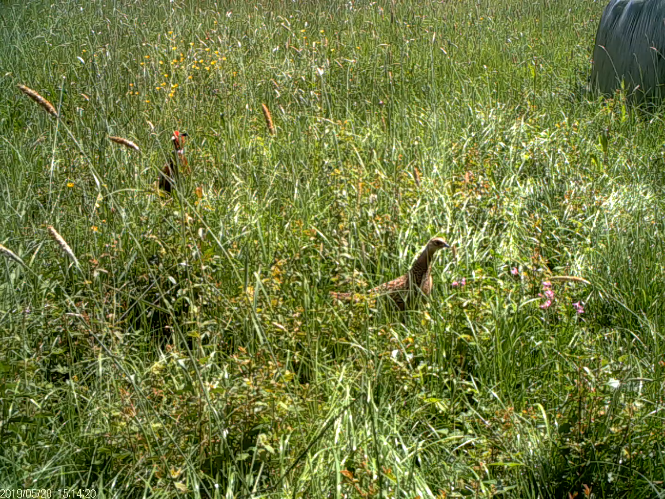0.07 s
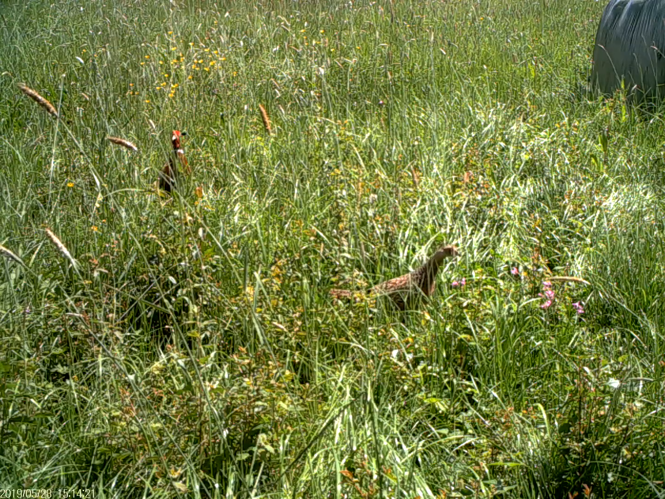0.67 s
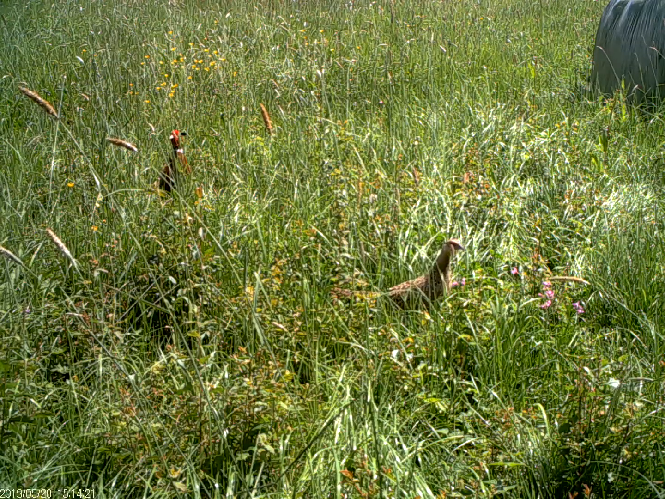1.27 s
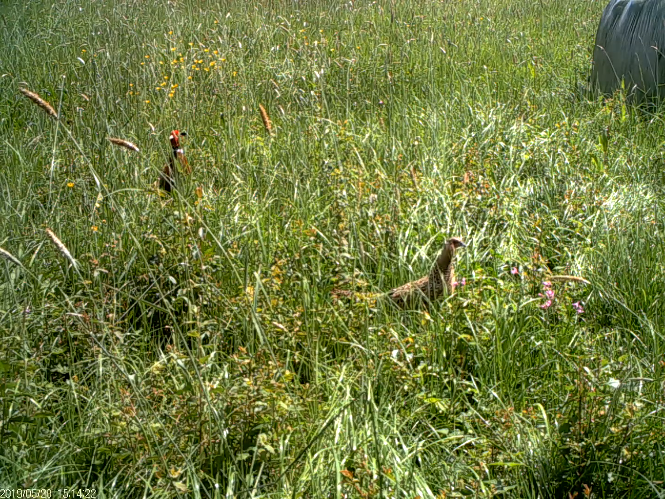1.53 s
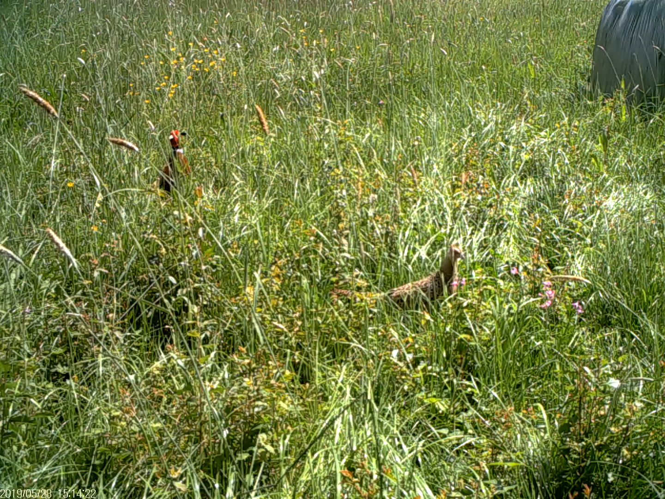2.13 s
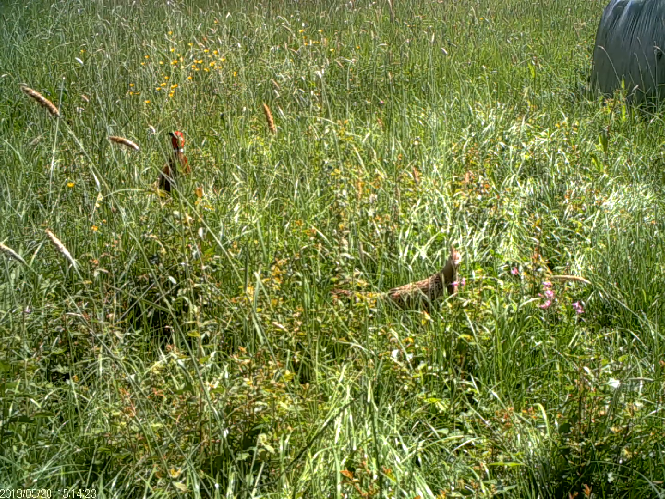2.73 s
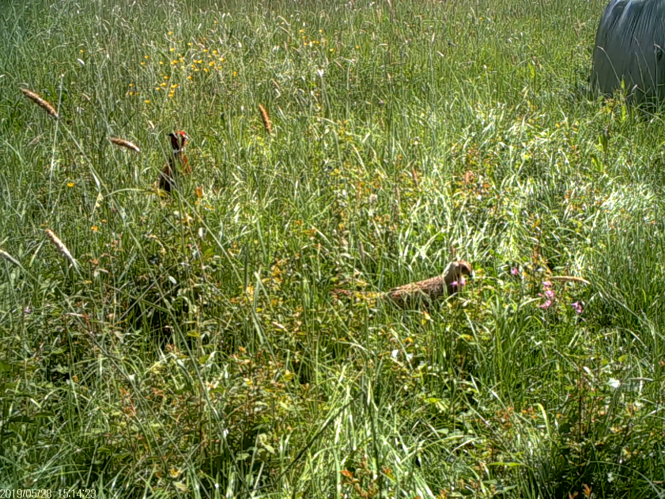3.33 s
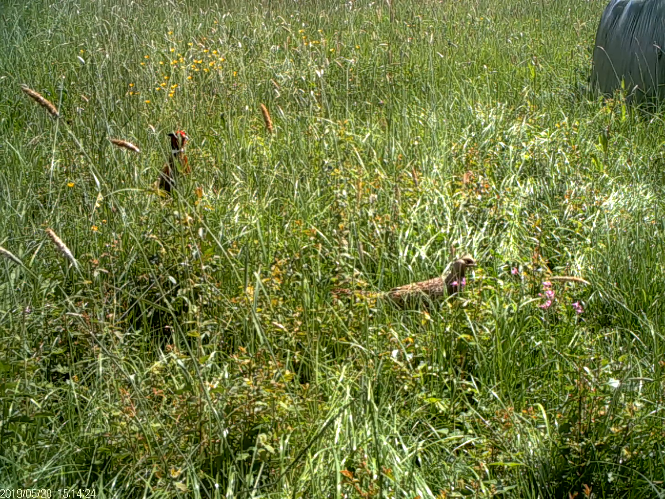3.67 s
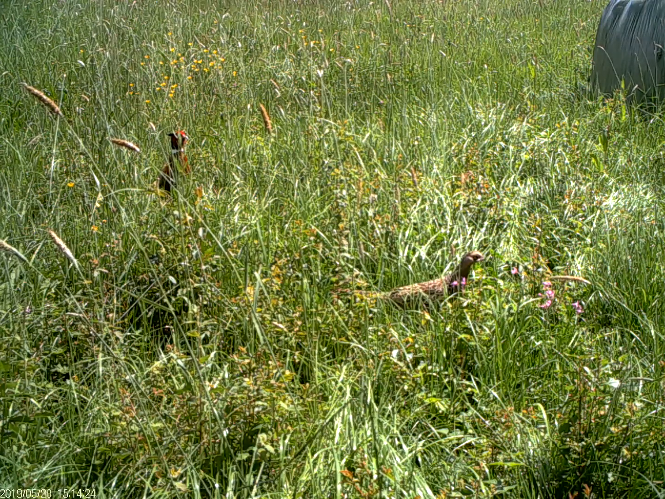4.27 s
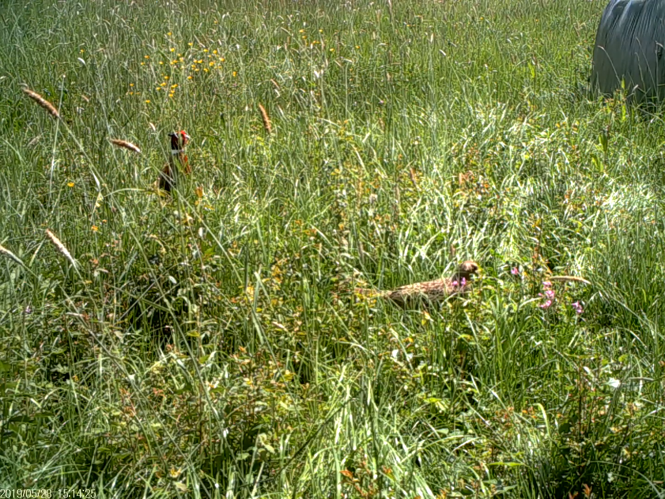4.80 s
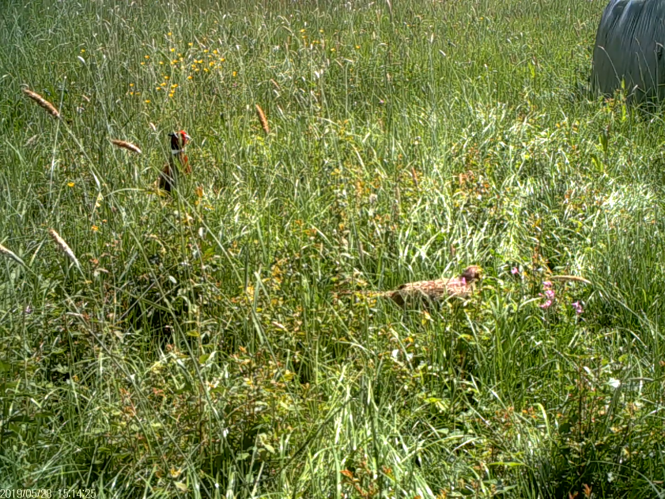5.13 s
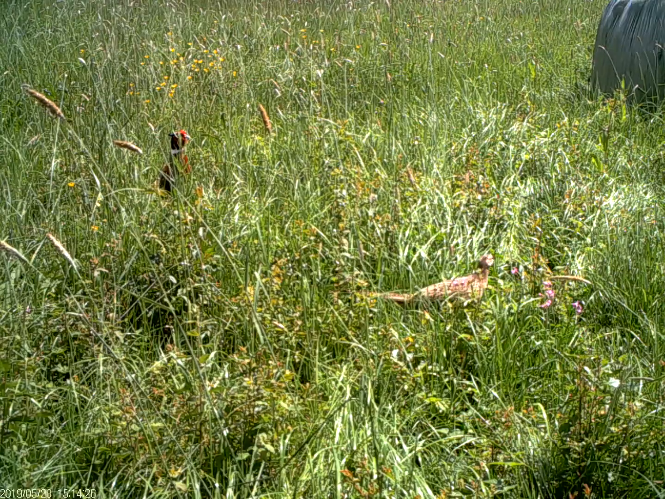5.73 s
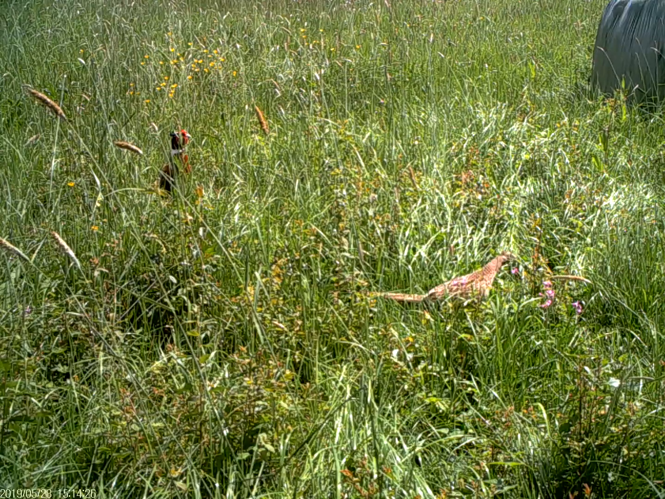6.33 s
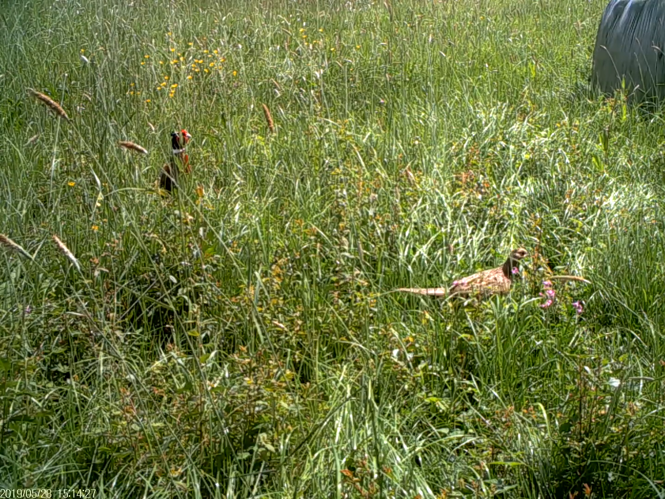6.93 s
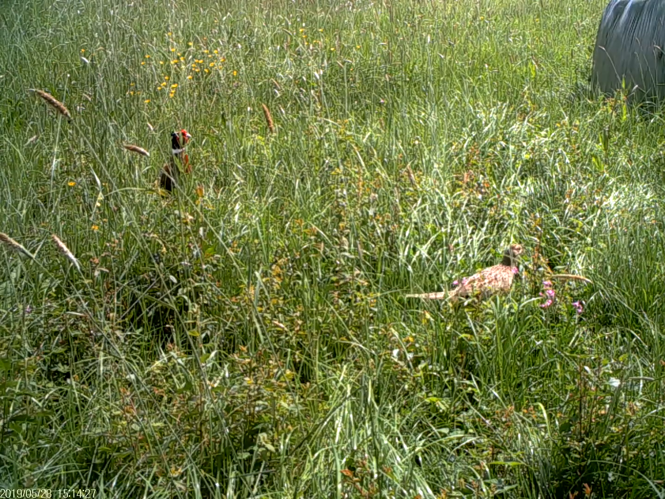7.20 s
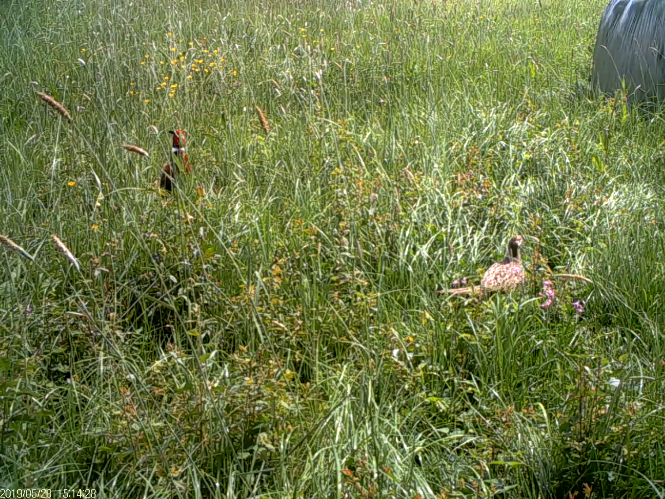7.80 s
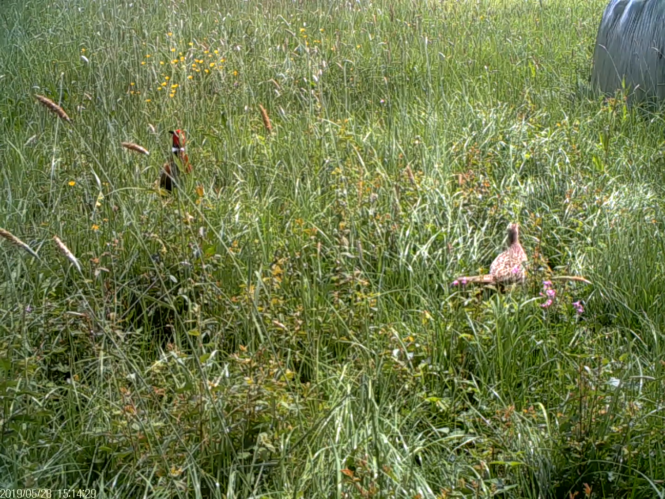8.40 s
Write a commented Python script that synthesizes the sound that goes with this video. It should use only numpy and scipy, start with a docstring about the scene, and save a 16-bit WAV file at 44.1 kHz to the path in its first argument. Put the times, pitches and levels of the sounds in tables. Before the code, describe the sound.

A microphone pops on with a quick run of ticks, then faint steady meadow hiss and a soft breeze rumble.

```python
"""A still summer meadow, heard through the microphone of a trail camera as it wakes up.
After a moment of silence the input switches on with a pop. The preamplifier then steps its gain up,
each step a small jump of voltage: a quickening run of ticks, under which the meadow fades in.
What stays is a steady hiss of air and electronics, a soft rumble of breeze at the microphone port,
a faint hum at the frame rate and, far across the field, four barely audible whistles of a bird."""
import sys
import numpy as np
from scipy.fft import rfft, irfft, next_fast_len
from scipy.io import wavfile
from scipy.ndimage import map_coordinates

SR = 44100
rng = np.random.default_rng(int(sys.argv[2]) if len(sys.argv) > 2 else 0)


def put_to_file(sound):
    """Save the sound as 16-bit audio at rate SR, in the file named by the first command-line argument."""
    columns = np.atleast_2d(sound).T  # one column per channel
    safe = np.clip(columns, -1, 1)
    whole_steps = np.round(safe * 32767)
    wavfile.write(sys.argv[1], SR, whole_steps.astype(np.int16))


N = 377937

# strength of the breeze, as its rumble at the microphone: t/s, level/dB
BREEZE_LEVEL = [(0, -46), (4.7, -49), (5.4, -45.5), (6.6, -46), (7.7, -44), (8.57, -41)]
POWER_ON_S, STEP_COUNT = 0.0726, 27


def amp(db):
    """Decibels to gain."""
    return 10 ** (np.asarray(db) / 20)


def unit(x):
    """x at rms 1."""
    return x / np.sqrt(np.mean(x ** 2) + 1e-20)


def seconds():
    """The time of every sample."""
    return np.arange(N) / SR


def curve(rows):
    """(s, value) rows joined by straight lines."""
    return np.interp(seconds(), *np.transpose(rows))


def wobble(rate):
    """A smooth random curve, rate knots a second."""
    return map_coordinates(rng.standard_normal(int(N * rate / SR) + 4), [seconds() * rate])


def filtered(x, response):
    """x times a response of frequency."""
    size = next_fast_len(N + SR)
    return irfft(rfft(x, size) * response(np.fft.rfftfreq(size, 1 / SR)), size)[:N]


def noise(spectrum):
    """Noise of rms 1, coloured by (Hz, dB) points on a log axis."""
    hz, db = np.transpose(spectrum)
    white = rng.standard_normal(N)
    return unit(filtered(white, lambda f: amp(np.interp(np.log(f + 1), np.log(hz + 1), db))))


def hiss(level_db=-53.0, breeze_share=0.047):
    """Even hiss of distant air and of the microphone itself; it lifts a trace with the breeze."""
    # spectrum of the hiss: f/Hz, relative level/dB
    spectrum = [(30, -8), (120, 2), (220, -2.5), (500, -5.5), (1000, -9), (1800, -12), (2200, -12.5),
                (3300, -15), (4500, -16.5), (6000, -18.5), (7500, -18.5), (10000, -20.5), (14700, -21),
                (15800, -28.5)]
    wind_db = curve(BREEZE_LEVEL)
    return amp(level_db + breeze_share * (wind_db - wind_db.mean())) * noise(spectrum)


def breeze(eddy_db=1.0):
    """Light air rumbles right at the microphone port and swells a little in eddies."""
    # spectrum of slowly moving air: f/Hz, relative level/dB
    spectrum = [(1, -13), (5, -1), (16, 1), (25, -6.5), (48, -7.5), (72, -16), (120, -28.5), (300, -53),
                (2000, -100)]
    return amp(curve(BREEZE_LEVEL) + eddy_db * wobble(5)) * noise(spectrum)


def far_bird(waver_hz=18):
    """Thin whistles from far across the field, barely above the hiss; the air blurs their pitch."""
    # the bird's whistles: start t/s, length/s, start f/Hz, end f/Hz, peak level/dB
    whistles = [(0.393, 0.2, 2160, 2230, -66), (2.98, 0.22, 2200, 2210, -68), (7.55, 0.13, 2130, 2040, -66),
                (8.0, 0.22, 2170, 2110, -66)]
    t, song = seconds(), np.zeros(N)
    for start, length, start_hz, end_hz, db in whistles:
        progress = np.clip((t - start) / length, 0, 1)
        pitch = start_hz + (end_hz - start_hz) * progress + waver_hz * wobble(60)
        swell = np.sqrt(np.abs(np.sin(np.pi * progress)))
        song += amp(db) * swell * np.sin(2 * np.pi * np.cumsum(pitch) / SR)
    return song


def frame_hum(frame_hz=30, waver_db=0.5):
    """Reading the image sensor loads the supply once a frame, which leaks into the sound."""
    # partials of the read-out hum: multiple of the frame rate, rms level/dB
    partials = [(0.5, -56.5), (1, -50), (1.5, -69), (2, -66.5), (3, -69.5), (4, -71), (6, -77.5)]
    phase = 2 * np.pi * frame_hz * seconds()
    hum = sum(amp(db) * np.sqrt(2) * np.sin(multiple * phase + rng.uniform(0, 2 * np.pi))
              for multiple, db in partials)
    return hum * amp(waver_db * wobble(2.05))


def step_times(first_s=0.0808, start_per_s=41.4, speedup_per_s2=391):
    """When the preamplifier's gain steps come: their rate grows evenly with time."""
    rate = np.sqrt(start_per_s ** 2 + 2 * speedup_per_s2 * np.arange(STEP_COUNT))
    return first_s + (rate - start_per_s) / speedup_per_s2


def waking_gain(step_db=0.47):
    """The preamplifier passes nothing before power-on, then climbs in equal steps to full gain."""
    steps_left = STEP_COUNT - np.searchsorted(step_times(), seconds())
    return (seconds() > POWER_ON_S) * amp(-step_db * steps_left)


def offset_jump(start, decay_s=0.12):
    """A unit jump of voltage that leaks away through the coupling capacitor."""
    age = np.maximum(seconds() - start, 0)
    return (age > 0) * np.exp(-age / decay_s)


def gain_ticks(first_db=-35.5, fade_power=0.6):
    """The input's offset jumps at every gain step, less each time: a run of small ticks."""
    jumps = amp(first_db) * np.linspace(1, 0, STEP_COUNT, endpoint=False) ** fade_power
    return sum(jump * offset_jump(start) for start, jump in zip(step_times(), jumps))


def range_ticks(first_db=-31.0, fall_db_per_s=21, width_s=0.0005):
    """Every third step changes the coarse gain range: the offset dips just before it, a sharper tick."""
    t, changes = seconds(), step_times()[2::3]
    depths = amp(first_db - fall_db_per_s * (changes - changes[0]))
    return -sum(depth * ((t > end - width_s) & (t <= end)) for end, depth in zip(changes, depths))


def power_on_pop(peak_db=-10.5):
    """The microphone input switches on and its offset appears at once."""
    return amp(peak_db) * offset_jump(POWER_ON_S)


def scene():
    """One microphone in the meadow: silence, the pop, then the background fades in under the ticks."""
    background = hiss() + breeze() + far_bird() + frame_hum()
    return (waking_gain() * background + gain_ticks() + range_ticks() + power_on_pop())[None]


def record(dry, top_hz=15900):
    """The camera keeps nothing above its band limit."""
    return np.array([filtered(channel, lambda hz: hz < top_hz) for channel in dry])


dry = scene()
out = record(dry)
put_to_file(out)
```